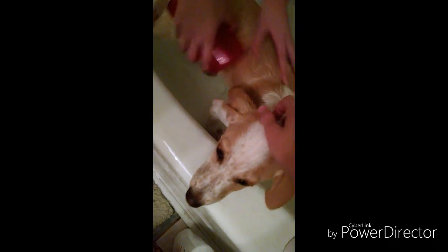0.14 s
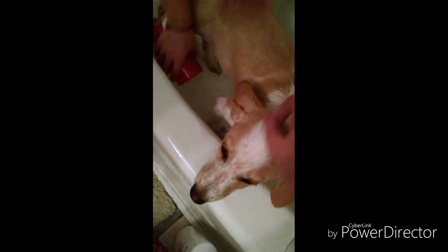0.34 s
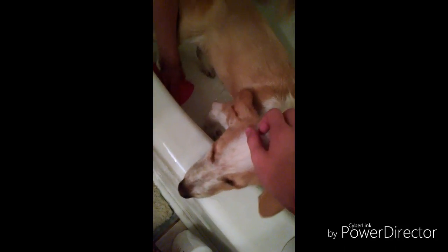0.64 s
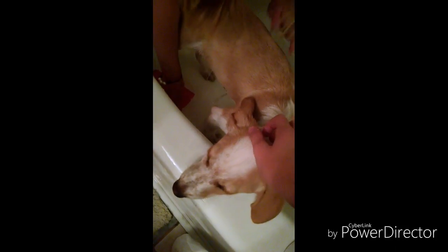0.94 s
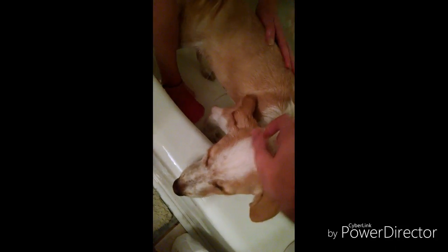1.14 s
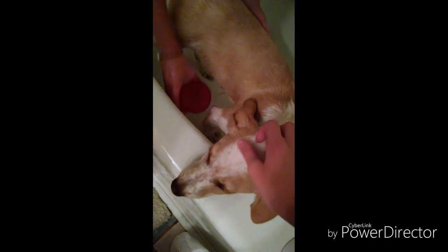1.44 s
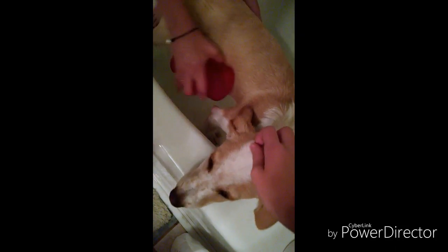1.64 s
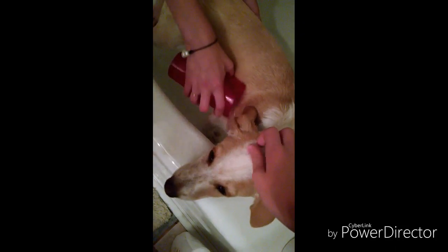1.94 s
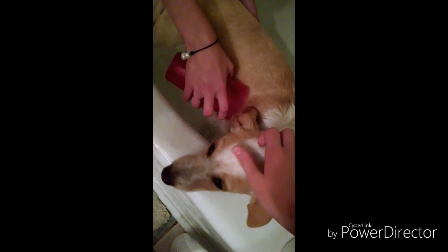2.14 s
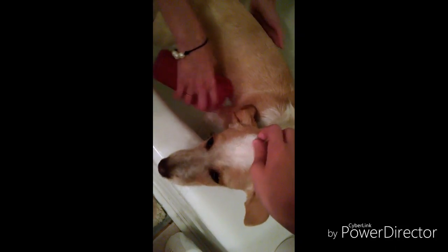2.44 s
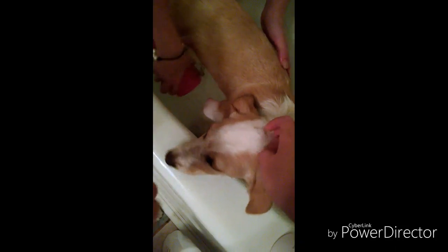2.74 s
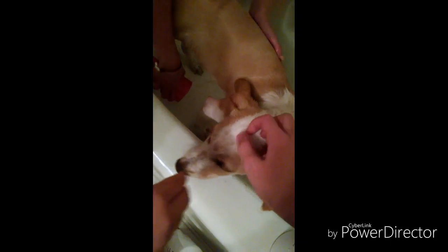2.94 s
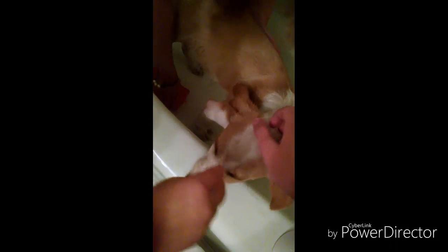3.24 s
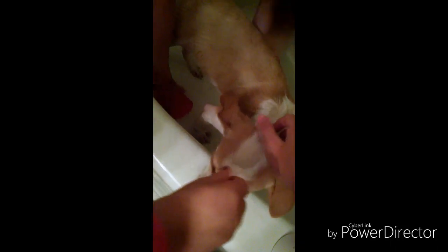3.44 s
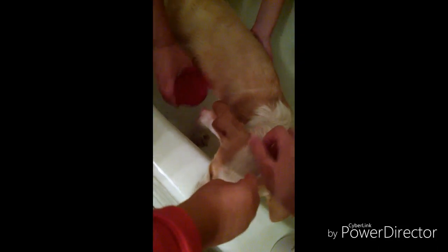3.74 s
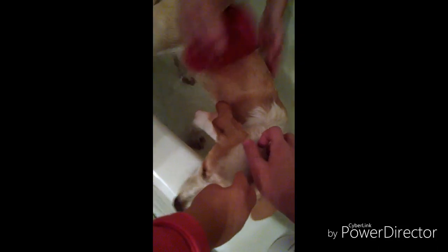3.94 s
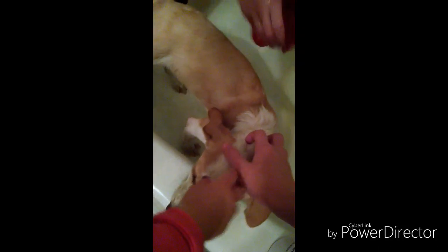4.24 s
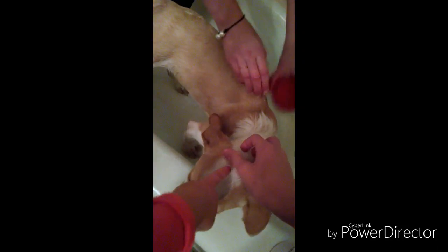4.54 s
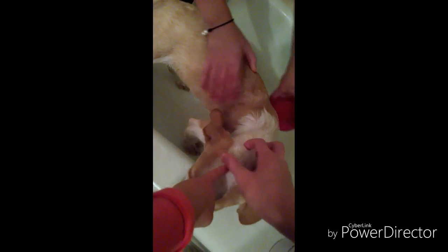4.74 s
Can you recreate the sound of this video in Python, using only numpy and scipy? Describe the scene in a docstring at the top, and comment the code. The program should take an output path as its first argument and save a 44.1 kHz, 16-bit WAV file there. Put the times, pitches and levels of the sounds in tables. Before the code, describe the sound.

Close in a small, hard bathroom, a plastic cup stirs shallow bath water and rinses a dog. From 0 s a soft surge, small bubble plops and crisp drops lead to a bright slap near 0.75 s. At 1.0-1.15 s the cup plunges, with throbbing air gulps, a heavy splash and a dull tub thump. Churning continues to about 1.5 s, then eases into trickling, rounded plinks and scattered drips until 2.3 s. A low glug near 2.4 s opens a fuller, sustained gush and churn lasting to about 3 s. Very sharp spatter strikes around 3.2 s, with another short splash and hollow gulp at 3.3-3.45 s. A brief glug near 3.75 s gives way to thin, murmuring runoff, with a crisp drop at 4.4 s and faint, sparse drips to the end. Wide stereo phone sound, short boxy echoes, faint rumble and hiss.

```python
"""Bath water scooped, plunged and poured from a plastic cup rinses a puppy in a shallow tub and runs off its coat.
Trapped air throbs and rising bubbles ring as damped oscillators; slaps and spray are bursts of noise and short rings.
Swarms of random bubbles and clicks build the churn, the trickle and the runoff; decaying modes make the tub thump.
Wall echoes, tub resonances and a short room tail surround the water, over a faint rumble and hiss.
A phone with a microphone at each end hears it, widens its stereo image and limits its band."""
import sys
import numpy as np
from scipy import signal
from scipy.fft import rfft, irfft, next_fast_len
from scipy.io import wavfile
from scipy.ndimage import uniform_filter1d, map_coordinates

SR = 44100
rng = np.random.default_rng(int(sys.argv[2]) if len(sys.argv) > 2 else 0)


def master(y):
    """Save y as 16-bit WAV."""
    cut = np.clip(np.atleast_2d(y).T, -1, 1)
    pcm = np.round(cut * 32767)  # scale
    wavfile.write(sys.argv[1], SR, pcm.astype(np.int16))


N = 214882


def amp(db):
    """Level law: decibels to amplitude gain."""
    return 10 ** (np.asarray(db) / 20)


def unit(x):
    """Power normalisation: x at rms 1."""
    return x / np.sqrt(np.mean(x ** 2) + 1e-20)


def along(points, hz):
    """Logarithmic frequency axis: (f/Hz, value) points interpolated on it."""
    f, v = np.transpose(points)
    return np.interp(np.log(hz + 1), np.log(f + 1), v)


def curves(rows):
    """Linear interpolation in time: one value per sample for each column after t/s."""
    s, *columns = np.transpose(rows)
    return [np.interp(np.arange(N) / SR, s, column) for column in columns]


def add(track, s, sound):
    """Superposition: mix a sound into a track at time s."""
    part = track[max(round(s * SR), 0):][:len(sound)]
    part += sound[:len(part)]


def filtered(x, response):
    """Linear filtering: the spectrum of x times a complex response of frequency."""
    m = next_fast_len(N + SR)
    return irfft(rfft(x, m) * response(np.fft.rfftfreq(m, 1 / SR)), m)[..., :N]


def coloured(x, spectrum, size=4096):
    """Minimum phase: x through a causal filter of unit energy with the given (f/Hz, level/dB) shape."""
    cepstrum = irfft(np.log(amp(along(spectrum, np.fft.rfftfreq(size, 1 / SR)))))
    # folding the cepstrum onto positive time makes the filter causal
    cepstrum[1:size // 2] *= 2
    cepstrum[size // 2 + 1:] = 0
    kernel = irfft(np.exp(rfft(cepstrum)))
    return signal.fftconvolve(x, kernel / np.linalg.norm(kernel))[:N]


def fade(t, t60):
    """Exponential decay: the amplitude falls by 60 dB in t60 seconds."""
    return np.exp(-np.log(1000) * t / t60)


def swell(s, hold, attack, fall_db_per_s):
    """Flow envelope: a linear build-up to time s, a hold and an exponential decay."""
    t = np.arange(N) / SR - s
    return np.clip(1 + t / attack, 0, 1) * amp(-fall_db_per_s * np.maximum(t - hold, 0))


def joined(level_db, power):
    """Incoherent addition: level in dB of a flow with more power on top."""
    return 10 * np.log10(amp(level_db) ** 2 + power)


def evened(x, seconds):
    """Short-time power normalisation: a stream of grains held near rms 1 over the given time."""
    local_power = np.abs(uniform_filter1d(x ** 2, int(seconds * SR) + 1))
    return x / np.sqrt(local_power + np.mean(x ** 2) / 20)


def bubble(hz, t60, rise, start_cycles):
    """Damped volume oscillation: an air pocket rings, and its pitch climbs as it nears the surface."""
    t = np.arange(int(t60 * SR) + 2) / SR
    pitch = hz * (1 + rise * (t / t60 - .15))
    onset = 1 - np.exp(-t * hz / start_cycles)
    ring = np.sin(2 * np.pi * np.cumsum(pitch) / SR) * fade(t, t60) * onset
    return ring / (np.abs(ring).max() + 1e-9)


def froth(low_hz, high_hz, cycles, spread_db, rise, count):
    """Superposed damped oscillators: a swarm of bubbles of random size, life and strength."""
    swarm = np.zeros(N)
    for when, width, life, strength in rng.random((count, 4)):
        hz = low_hz * (high_hz / low_hz) ** width
        ring = bubble(hz, cycles * (.5 + life) / hz, rise, start_cycles=0.51)
        add(swarm, when * N / SR, amp(-spread_db * strength) * ring)
    return swarm


def droplets(spread_db, mist, count):
    """Random impulse process: tiny impacts and bursting films, most faint, over a fine mist of noise."""
    when, strength = rng.random((count, 2)).T
    gains = amp(spread_db * np.minimum(-np.log(1 - strength), 3))
    clicks = np.bincount((when * N).astype(int), gains * rng.choice([-1, 1], count), N)
    return unit(clicks) + mist * rng.standard_normal(N)


def splats(per_s, t60, spread_db, share):
    """Shot-noise modulation: gain of water landing in lumps, each hitting at once and dying quickly."""
    when, size = rng.random((int(per_s * N / SR), 2)).T
    hits = np.bincount((when * N).astype(int), amp(spread_db * size) ** 2, N)
    power = np.abs(signal.fftconvolve(hits, fade(np.arange(SR // 10) / SR, t60) ** 2)[:N])
    share = np.clip(share, 0, 1)
    return np.sqrt(1 - share + share * power / power.mean())


def room_tone():
    """Stationary noise: a faint steady rumble and hiss, independent in the two channels."""
    # background spectrum: f/Hz, relative level/dB
    quiet = [(20, -1), (70, 3), (150, -5.5), (400, -4.5), (1200, -8.5), (3000, -13), (15000, -4.5)]
    return amp(-43.5) * np.array([coloured(rng.standard_normal(N), quiet) for _ in range(2)])


def echoes(early_db, tail_db):
    """Early reflections and diffuse decay: one stereo response of close tub walls and the room's tail."""
    # reverberation of the small hard room: f/Hz, t60/s
    room = [(100, 0.13), (500, 0.3), (2000, 0.2), (5000, 0.23), (10000, 0.15), (16000, 0.079)]
    wall_t60 = 0.022  # s; later wall echoes are weaker
    hz, t, z = signal.stft(rng.standard_normal((2, SR // 2)), SR, nperseg=256)
    tail = signal.istft(z * fade(t, along(room, hz)[:, None]), SR, nperseg=256)[1]
    # the tail starts 5 ms late
    tail = np.pad(tail / np.linalg.norm(tail[0]), ((0, 0), (int(.005 * SR), 0)))
    walls = np.zeros_like(tail)
    for side in walls:
        lags = rng.integers(SR // 1500, SR // 110, size=14)
        side[lags] = rng.standard_normal(size=14) * fade(lags / SR, wall_t60)
        side /= np.linalg.norm(side)
    return amp(tail_db) * tail + amp(early_db) * walls


def bathroom(x, early_db, tail_db, tub_db, count=16):
    """Time-varying reverberation and tub modes at two microphones; echoes change as splashes move about."""
    # air resonances between the tub walls: f/Hz, width/Hz, relative level/dB
    tub = [(227.4, 7, -4), (276.7, 7.4, -2.5), (360.3, 6, -4), (457.6, 7.7, -6), (691.3, 11, -6),
           (843, 5.2, -17)]
    hop = N // count + 1
    echo, padded = np.zeros((2, N + hop)), np.pad(x, (hop, 2 * hop))
    # overlapping pieces, each with newly drawn echoes
    for start in range(0, N + hop, hop):
        piece = padded[start:start + 2 * hop] * np.hanning(2 * hop)
        answers = signal.fftconvolve(piece[None], echoes(early_db, tail_db), axes=1)
        for track, answer in zip(echo, answers):
            add(track, start / SR, answer)

    def apart(f):
        # long waves reach both microphones more alike
        return np.pi / 4 * np.clip(along([(80, 0.13), (300, 0.71), (700, 0.61), (1400, 1.0)], f), 0, 1)

    def modes(f):
        return sum(amp(db) * 1j * f * w / (c * c - f * f + 1j * f * w) for c, w, db in tub)

    mid = filtered(echo[0, hop:], lambda f: np.cos(apart(f)))
    side = filtered(echo[1, hop:], lambda f: np.sin(apart(f)))
    # the right microphone faces the water; the phone's body shades the left one in the treble
    shade = [(120, -42), (400, 4.0), (1200, -4.0), (4000, -60), (12000, -49.0)]  # f/Hz, level/dB
    shaded = filtered(x, lambda f: amp(along(shade, f)))
    return np.array([shaded + mid + side, x + mid - side]) + amp(tub_db) * filtered(x, modes)


def thumps():
    """Modal excitation: the cup knocks the tub bottom and the tub's shell gives a short dull boom."""
    # the cup knocking the tub bottom: t/s, level/dB
    knocks = [(1.015, -33.5), (1.109, -28.5), (1.165, -36), (3.297, -35), (3.438, -40), (3.884, -40.5)]
    # shell modes, detuned at each knock: nominal f/Hz, relative level/dB, t60/s
    shell = [(108, -7, 0.21), (150.4, -5, 0.17), (202, -3.5, 0.16), (246, 1.5, 0.13), (310, 8.5, 0.09)]
    out, t = np.zeros(N), np.arange(SR // 4) / SR
    onset = 1 - np.exp(-t / 0.0043)
    for s, db in knocks:
        for (hz, mode_db, t60), detune in zip(shell, rng.standard_normal(len(shell))):
            mode = np.sin(2 * np.pi * hz * (1 + 0.057 * detune) * t) * fade(t, t60) * onset
            add(out, s, amp(db + mode_db) * mode)
    return out


def runoff():
    """Bubble entrainment: a thin stream murmurs with bubbles of nearly one size; some glide up as they surface."""
    # streams off the wet coat: t/s, hold/s, central bubble f/Hz, level/dB of the murmur
    streams = [(3.627, 0.024, 895, -45), (3.747, 0.099, 1027, -44), (4.015, 0.031, 955, -45),
               (4.122, 0.033, 1186, -47.5), (4.27, 0.091, 1273, -52.5), (4.654, 0.065, 1363, -52.5)]
    spread = 1.2  # pitch ratio of the bubbles about their centre
    out = np.zeros(N)
    for s, hold, hz, db in streams:
        murmur = froth(hz / spread, hz * spread, cycles=58, spread_db=8, rise=0.25, count=420)
        gurgle = froth(hz / spread, hz, cycles=90, spread_db=6, rise=.7, count=260)
        stream = evened(murmur, 0.067) + amp(-16) * evened(gurgle, .03)
        out += amp(db) * swell(s, hold, attack=0.036, fall_db_per_s=119) * stream
    return out


def surges():
    """Power summation: power of the churn, gulps and spray that the cup's strokes stir up."""
    # the cup dips, plunges or pours: t/s, hold/s, then churn, deep gulp and spray, each relative level/dB
    strokes = [(0.007, 0.075, -35, -47.5, -47), (0.772, 0.037, -30, -51, -29), (1.01, 0.029, -27, -41, -27),
               (1.113, 0.01, -19.5, -28.5, -28.5), (1.296, 0.09, -30.5, -45, -31.5),
               (1.398, .11, -31.5, -64, -56), (2.342, 0.041, -39.5, -46.5, -31),
               (2.42, 0.085, -25, -40.5, -27.5), (2.545, 0.12, -24, -46, -28.5),
               (2.673, 0.19, -24, -38.5, -28.5), (2.882, 0.1, -23.5, -39.5, -29),
               (3.022, 0.026, -32, -44, -48), (3.297, 0.0025, -23, -39, -27.5),
               (3.36, 0.03, -34.5, -39, -56), (3.437, 0.038, -35, -35.5, -53),
               (3.728, 0.07, -31, -73, -39.5), (3.88, 0.019, -44, -51, -53)]
    return sum((amp(levels_db)[:, None] * swell(s, hold, attack=0.011, fall_db_per_s=285)) ** 2
               for s, hold, *levels_db in strokes)


def spray(lumps):
    """Impact noise and bubble rings: drops tick at their own pitches; heavy spatter merges into a rush."""
    # water spattering off the cup and the coat: t/s, relative level/dB
    spatter = [(0.0, -42.5), (0.28, -39), (0.46, -34.5), (0.83, -44), (1.22, -36.5), (1.46, -33),
               (2.03, -40.5), (2.31, -41), (2.56, -53), (2.81, -26.5), (3.21, -39), (3.34, -57),
               (3.47, -41), (3.84, -39.5), (4.01, -46), (4.87, -44)]
    # spectrum of separate drops: f/Hz, relative level/dB
    tick_spectrum = [(700, -66), (1800, 0), (2500, -2), (3200, -4.5), (4300, 0.5), (6000, -4), (8800, 3.5),
                     (11000, 4.5), (14000, 7), (16000, -14)]
    # spectrum of heavy spatter: f/Hz, relative level/dB
    rush_spectrum = [(700, -68), (1800, 1), (2500, -8), (3200, -5), (4300, -1), (6000, -2.5), (8800, 4.5),
                     (11000, 4.5), (14000, 4), (16000, -16)]
    spatter_db = joined(curves(spatter)[0] - 1.5, surges()[2])
    # the smallest bubbles fizz; longer pings and short taps give drops their pitches
    fizz = unit(froth(3200, 14000, cycles=30, spread_db=14, rise=.1, count=5000))
    pings = unit(froth(3200, 12000, cycles=50, spread_db=14, rise=.08, count=600))
    taps = unit(froth(3200, 15000, cycles=9, spread_db=18, rise=.1, count=520))
    drops = droplets(spread_db=8, mist=0.25, count=1500)
    ticks = coloured(drops + taps + 0.5 * fizz + .65 * pings, tick_spectrum)
    dense_drops = droplets(spread_db=1.5, mist=0.3, count=10000)
    patter = coloured(dense_drops + .7 * fizz + .8 * taps + .4 * pings, rush_spectrum)
    # power share of the rush
    heavy = 1 / (1.2 + np.exp(-(spatter_db + 33) / 3))
    clumps = splats(per_s=45, t60=.035, spread_db=8, share=.42)
    light_part = np.sqrt(1 - heavy) * clumps * evened(ticks, 0.12)
    heavy_part = np.sqrt(heavy) * lumps * evened(patter, 0.092)
    return amp(spatter_db) * (light_part + heavy_part)


def flow():
    """Incoherent addition: levels in dB of deep gulps and churn, from the slosh plus the cup's surges."""
    # slosh of the bath water between the strokes: t/s, relative level/dB
    slosh = [(0.0, -48), (0.45, -33), (0.64, -40.5), (0.96, -49.5), (1.31, -33), (1.94, -41), (2.47, -41),
             (2.62, -51), (2.89, -48), (3.08, -39), (3.42, -72), (3.56, -40.5), (3.89, -37.5), (4.52, -60),
             (4.87, -48)]
    slosh_db, = curves(slosh)
    churn, gulp, _ = surges()
    # deep lapping gains 0.3 dB per dB of slosh
    lapping_db = -55 + 0.3 * (slosh_db - slosh_db.mean())
    return joined(lapping_db, gulp), joined(slosh_db + 0.5, churn)


def stirred_water(lumps):
    """Collective bubble noise: gentle flow trickles in chirps; hard flow churns and gulps with trapped air."""
    # spectra of the deep gulps, of the gentle trickle and of the churn: f/Hz, relative level/dB
    gulp_spectrum = [(40, -10), (70, -21), (130, -15.5), (200, -11), (300, 4), (420, 2.5), (560, -5),
                     (900, -21.5)]
    trickle_spectrum = [(250, -22), (500, -7), (800, -5.5), (1250, 1), (1900, 7), (2800, 12), (4500, -26.5)]
    churn_spectrum = [(200, -24), (380, -10.5), (520, -4), (800, -2.5), (1300, -5), (2000, 0), (2800, 6),
                      (4500, -12)]
    gulp_db, churn_db = flow()
    deep = unit(froth(101.0, 600, cycles=10.4, spread_db=16, rise=0.26, count=1700))
    chirps = unit(froth(520, 1800, cycles=44, spread_db=13, rise=.9, count=400))
    foam = unit(froth(330, 2800, cycles=26, spread_db=17, rise=.3, count=3400))
    gulp = coloured(deep + rng.standard_normal(N), gulp_spectrum)
    sparse_drops = droplets(spread_db=2, mist=0.16, count=1500)
    trickle = coloured(chirps + 0.25 * sparse_drops, trickle_spectrum)
    pips = unit(froth(1500, 4600, cycles=32, spread_db=14, rise=.2, count=1500))
    dense_drops = droplets(spread_db=1, mist=0.6, count=5000)
    churn = coloured(foam + .22 * pips + 0.45 * dense_drops, churn_spectrum)
    # power share of the churn against the trickle
    hard = 1 / (1.0 + np.exp(-(churn_db + 29.5) / 3))
    body = np.sqrt(hard) * lumps * evened(churn, 0.025) + np.sqrt(1 - hard) * evened(trickle, 0.047)
    return amp(gulp_db) * evened(gulp, 0.025) + amp(churn_db - 5.5) * body


def throbs():
    """Driven volume oscillation: an air pocket rings while water squeezes it; its changing shape wavers the pitch."""
    # air trapped under the cup: onset t/s, hold/s, mean f/Hz, level/dB
    pockets = [(0.061, 0.018, 465, -29), (0.765, 0.01, 540, -30.5), (1.018, 0.019, 488, -27.5),
               (1.111, 0.024, 521, -21.5), (1.143, 0.016, 510, -35), (2.349, 0.031, 345, -32),
               (2.446, 0.029, 370, -18), (2.497, 0.012, 362.2, -19.5), (2.786, 0.06, 431.5, -27),
               (3.297, 0.01, 435, -26.5), (3.337, .008, 448, -29), (3.364, 0.018, 466, -24.5),
               (3.44, 0.014, 455, -28), (3.456, 0.043, 765, -40), (3.47, 0.024, 620, -38),
               (3.729, 0.011, 814, -27), (3.775, 0.017, 878, -42)]
    attack, waver_depth, waver_per_s = 0.0043, 0.0682, 150  # s, fraction of the pitch, random values per s
    out, count = np.zeros(N), int(N * waver_per_s / SR) + 4
    waver = map_coordinates(rng.standard_normal(count), [np.arange(N) * waver_per_s / SR])
    for s, hold, hz, db in pockets:
        phase = 2 * np.pi * np.cumsum(hz * (1 + waver_depth * waver)) / SR
        out += amp(db) * swell(s + attack, hold, attack, fall_db_per_s=700) * np.sin(phase)
    return out


def slaps():
    """Impact noise: spiky bursts with a bright edge, a duller body and a fine top; trapped air rings briefly."""
    # water on water and tub: t/s, relative level/dB, body level/dB re the slap, central f/Hz of the trapped air
    impacts = [(.0378, -22.5, -10, 8900), (0.0568, -16, -21, 8370), (0.143, -22, -22, 8700),
               (0.181, -38, 5, 4110), (0.305, -21, -20, 6600), (.362, -16.5, -1, 4200),
               (0.434, -17.5, -4.5, 4160), (0.4751, -21, -3.5, 5950), (0.6018, -14.5, -9.5, 9600),
               (0.6398, -20.5, -3.5, 4060), (0.7375, -8, -11.5, 4760), (0.7954, -11, -17, 6330),
               (0.919, -17.5, -3, 4140), (0.9887, -18.5, -9, 11770), (1.0164, -10, -11.5, 8900),
               (1.0944, -16, -25, 10100), (1.114, -8, -11.5, 4570), (1.1736, -16.5, -20, 8850),
               (1.26, -28.5, -22, 12000), (1.2832, -10, -16, 7500), (1.351, -14.5, -7, 4200),
               (1.401, -24.5, 7, 3800), (1.4559, -16, -31, 9400), (1.484, -18, -28, 8600),
               (1.514, -22.5, -6, 4300), (1.555, -17, -9, 9900), (1.601, -16.5, -16, 10500),
               (1.6277, -16.5, -2.5, 4170), (1.7087, -17, -11, 11100), (1.8387, -28.5, -14, 13500),
               (1.8891, -41, -8, 4570), (1.922, -12.5, -40, 8920), (2.0226, -24, -7, 11400),
               (2.0646, -21, -7.5, 6700), (2.084, -21, -22, 4400), (2.133, -24, -22, 3450),
               (2.223, -24, -4, 3720), (2.2384, -19.5, -3, 4540), (2.273, -19.5, -9, 8900),
               (2.3388, -20, -7, 4050), (2.412, -16, -7, 3740), (2.735, -21.5, -0.5, 3770),
               (2.81, -26, 6.5, 3870), (2.899, -10.5, -20, 9300), (2.974, -16, -11, 9100),
               (3.124, -18.5, -23, 10200), (3.1752, -3, -26, 8260), (3.179, -2.5, -22, 9000),
               (3.197, -4, -19.5, 9430), (3.296, -7, -15, 9800), (3.358, -21, -7, 8950),
               (3.4401, -29.5, -2.5, 4240), (3.512, -32, 0, 4100), (3.562, -26.5, -16, 3200),
               (3.695, -25.5, 1, 4200), (3.766, -19.5, -5.5, 3040), (3.918, -32.5, 2, 4160),
               (3.832, -12, -21, 9100), (3.935, -21.5, -11, 9700), (4.0393, -27.5, -16, 11000),
               (4.0746, -24, -8.5, 11700), (4.094, -31, -4, 3800), (4.135, -21.5, -21, 4470),
               (4.21, -31, -13, 4430), (4.245, -20, -34, 9400), (4.3, -22.5, -22, 6700),
               (4.317, -28, -9, 4080), (4.372, -25.5, -14, 3800), (4.423, -7.5, -14, 3910),
               (4.492, -24, -14, 8750), (4.5319, -17, -31, 9200), (4.555, -37, -19, 10500),
               (4.7141, -20, -19, 9400), (4.828, -25.5, -24, 8600)]
    # spectra of the three bands of a burst: f/Hz, relative level/dB
    edge_spectrum = [(300, -35), (2000, -16.5), (5500, -12), (8800, 3), (11000, -1.5), (14000, -19.5)]
    body_spectrum = [(300, -27), (1300, -6), (2800, 10.5), (4100, 5.5), (5500, 9.5), (9000, -4.5)]
    top_spectrum = [(3000, -56), (8000, -7), (11500, 11), (14000, 11.5), (16000, 5)]
    bursts, rings, t = np.zeros((3, N)), np.zeros(N), np.arange(SR // 5) / SR
    for s, db, body_db, hz in impacts:
        # 20 ms decay at -21 dB; a slap 42 dB stronger lasts twice as long
        t60 = 0.02 * 2 ** ((db + 21) / 42)
        shape = fade(t, t60) * (1 - np.exp(-t / 0.0001))
        # the fine top grows for the smallest drops, 40.5 dB per octave above 8830 Hz
        top_db = -18.5 + 40.5 * max(np.log2(hz / 8830), 0)
        for track, level_db in zip(bursts, [db - 10.0, db + body_db - 2.0, db + top_db]):
            spikes = amp(0.67 * rng.standard_normal(len(t))) * rng.standard_normal(len(t))
            burst = unit(shape * spikes) * np.sqrt(np.mean(shape ** 2))
            add(track, s - .0005, amp(level_db + 5) * burst)
        for detune, lag in rng.random((3, 2)):
            ring = bubble(hz * (1 + 0.25 * (detune - .5)), 0.008, rise=0.01, start_cycles=0.68)
            add(rings, s + .002 * lag, amp(db - 10) * ring)
    spectra = [edge_spectrum, body_spectrum, top_spectrum]
    return rings + sum(coloured(track, spectrum) for track, spectrum in zip(bursts, spectra))


def plinks():
    """Damped volume oscillation: single bubbles ring one by one; a closing cavity sweeps up ever faster."""
    # single bubbles that stand out, small and large: t/s, nominal f/Hz, relative level/dB, t60/s
    single_bubbles = [(.091, 1950, -22.5, 0.03), (.228, 640, -30.5, 0.059), (.366, 1322, -25, .08),
                      (.446, 980, -23.5, 0.053), (.517, 1164, -24.5, 0.088), (.567, 597, -25, 0.047),
                      (.672, 859, -29, 0.19), (.706, 3430, -15.5, .035), (.737, 4520, -8.5, 0.012),
                      (.758, 586, -19.5, 0.067), (.768, 656, -16.5, 0.061), (.879, 1333, -23, 0.034),
                      (.922, 1043, -29.5, 0.051), (1.052, 1194, -19, 0.061), (1.229, 730, -23.5, 0.049),
                      (1.358, 625, -19, 0.1), (1.398, 760, -23.5, 0.068), (1.5, 860, -25, 0.055),
                      (1.66, 1260, -23.5, 0.054), (1.668, 617, -19, 0.058), (1.678, 812, -22.5, 0.06),
                      (1.749, 684, -27, 0.076), (1.806, 1344, -24.5, 0.044), (1.987, 610, -28, 0.091),
                      (2.062, 724, -25, 0.046), (2.171, 642, -25.5, 0.11), (2.242, 1990, -23, 0.032),
                      (2.205, 680, -32, .09), (2.292, 1240, -34, .09), (2.36, 1035, -32, 0.11),
                      (2.68, 3950, -11.5, 0.011), (2.98, 664, -20, 0.085), (3.305, 634, -31, .07),
                      (3.36, 673, -27.5, .07), (3.387, 783, -28.5, .06), (3.44, 700, -28, 0.066),
                      (3.642, 917, -22, 0.064), (3.739, 788, -16, 0.045), (3.803, 1017, -19, 0.052),
                      (3.988, 1026, -33, 0.071), (4.014, 935, -30, .07), (4.05, 816, -31, .07),
                      (4.125, 1250, -29.5, .05), (4.178, 1245, -37, 0.042), (4.21, 3950, -11.5, 0.0072),
                      (4.268, 1397, -37, 0.066), (4.355, 1184, -33.5, .04), (4.578, 1430, -41, .04),
                      (4.596, 1080, -40, .06), (4.66, 1310, -30, .05), (4.705, 1363, -38, .06),
                      (4.756, 1436, -29.5, 0.047), (4.789, 3300, -23.5, 0.02)]
    # cavities closing as they reach the surface: t/s, length/s, start f/Hz, end f/Hz, relative level/dB
    cavities = [(0.081, 0.022, 1120, 2100, -33), (0.175, 0.023, 1343, 1970, -27.5),
                (.203, 0.021, 1330, 2010, -37.5), (.326, 0.026, 1363, 1730, -33.5),
                (0.565, 0.029, 1380, 2170, -33.5), (0.611, 0.034, 612, 1220, -36.5),
                (0.77, 0.017, 690, 2200, -32), (0.874, 0.018, 890, 1600, -41), (1.304, .07, 275, 693, -29),
                (1.585, .03, 995, 1310, -35.5), (1.784, 0.034, 935, 1600, -40.5),
                (2.023, 0.038, 640, 1320, -31.5), (2.061, 0.0385, 690, 1106, -38),
                (2.105, 0.025, 854, 1240, -36), (2.183, 0.026, 638, 1560, -29.5),
                (3.606, 0.053, 728, 1020, -37.5), (3.673, 0.026, 823, 1300, -37),
                (3.904, 0.041, 1250, 1550, -43)]
    out = np.zeros(N)
    for s, hz, db, t60 in single_bubbles:
        add(out, s, amp(db - 2.0) * bubble(hz, t60, rise=0.16, start_cycles=1.07))
    for s, length, start_hz, end_hz, db in cavities:
        u = np.linspace(0, 1, int(length * SR) + 2)
        pitch = start_hz * (end_hz / start_hz) ** (u * u)
        sweep = np.sin(np.pi * u ** .8) * np.sin(2 * np.pi * np.cumsum(pitch) / SR)
        add(out, s, amp(db + 1.5) * sweep)
    return out


def scene():
    """Superposition: all the water in the room; single bubbles ring in open water, farther from the walls."""
    lumps = splats(per_s=110, t60=0.043, spread_db=6, share=0.36)
    water = throbs() + thumps() + slaps() + stirred_water(lumps) + runoff() + spray(lumps)
    bubbles = bathroom(plinks(), early_db=-6, tail_db=-3.0, tub_db=8.5)
    surrounded = bathroom(water, early_db=0.0, tail_db=-1.5, tub_db=9.5)
    return amp(-1.5) * (surrounded + bubbles) + room_tone()


def record(dry):
    """Crosstalk subtraction: a delayed copy of each channel leaves the other, widening the image; then a band limit."""
    delay, top_hz = .000389, 15550  # s, Hz
    share = [(100, 0.18), (1200, 0.55), (2600, 0.95), (5200, 0.48), (8000, 0.22), (14000, 0.44)]  # f/Hz, gain
    # the left channel is 0.6 dB stronger, the right 0.6 dB weaker
    balanced = dry * amp([[.6], [-.6]])

    def crossing(f):
        return np.clip(along(share, f), 0, .95) * np.exp(-2j * np.pi * f * delay)

    crossed = filtered(balanced[::-1], crossing)
    return filtered(balanced - crossed, lambda f: 1 / np.sqrt(1 + (f / top_hz) ** 160))


dry = scene()
out = record(dry)
master(out)
```